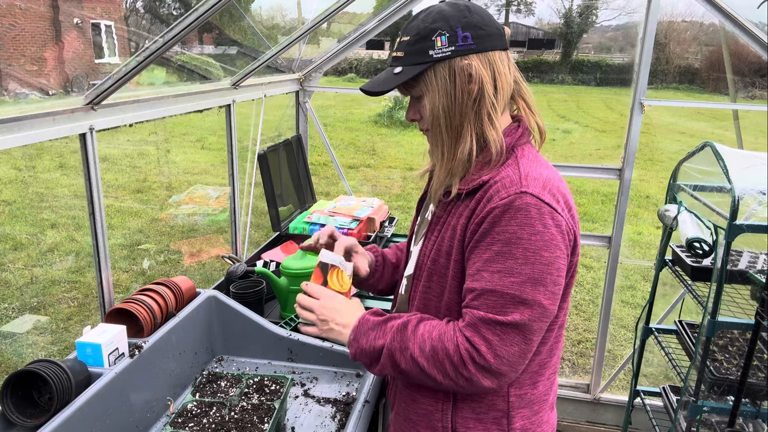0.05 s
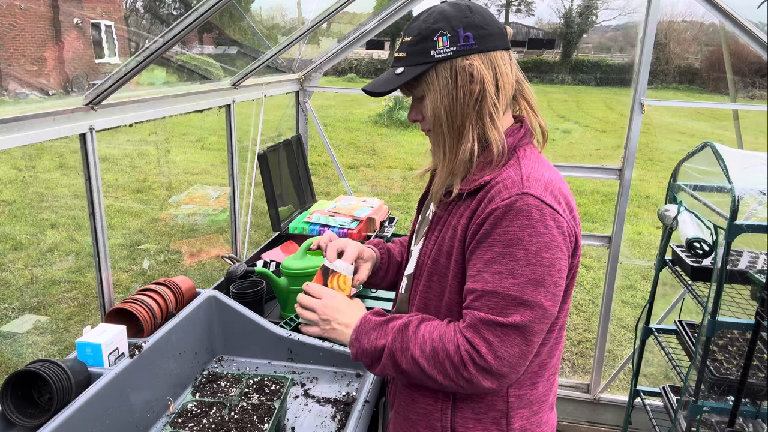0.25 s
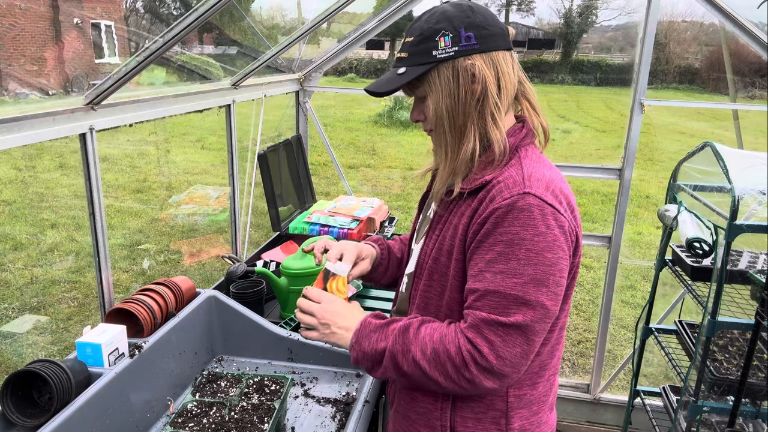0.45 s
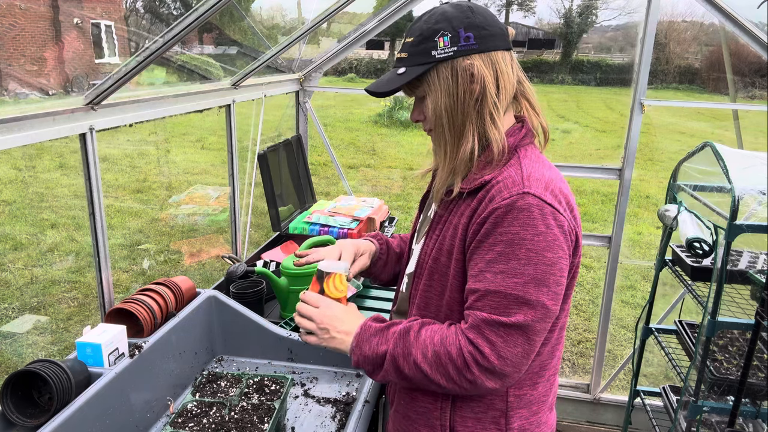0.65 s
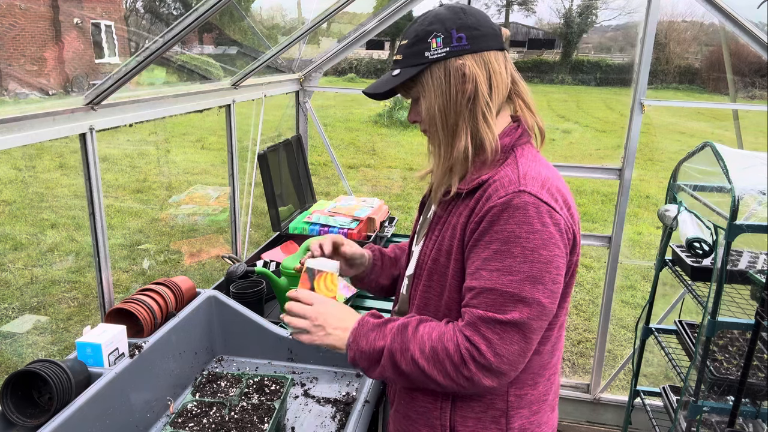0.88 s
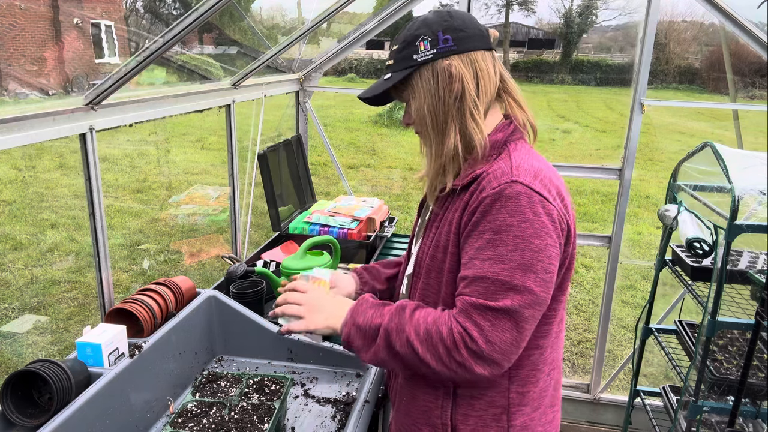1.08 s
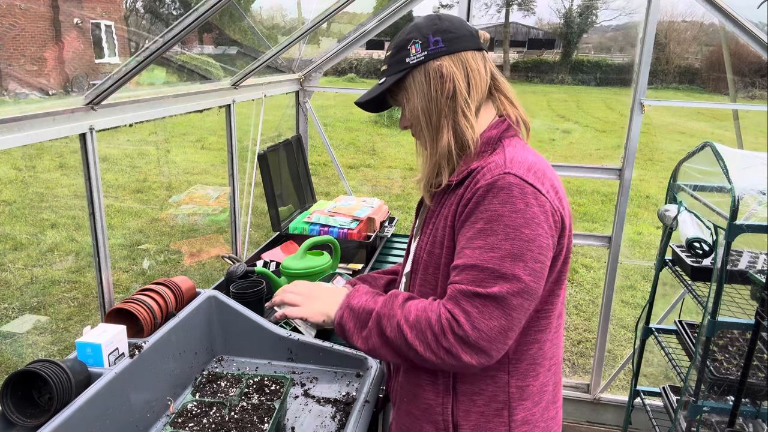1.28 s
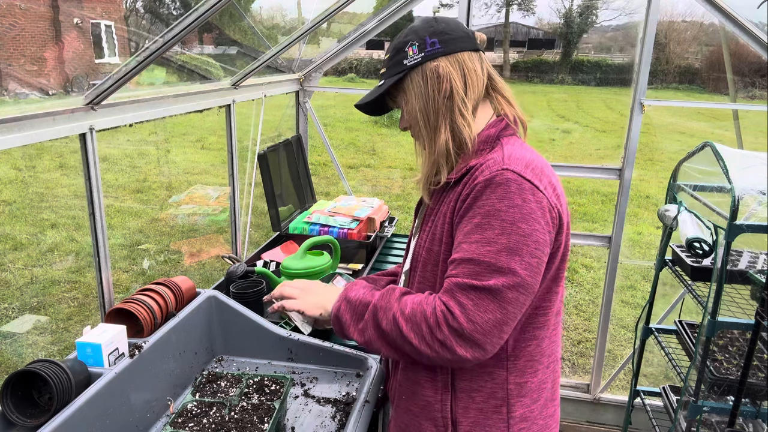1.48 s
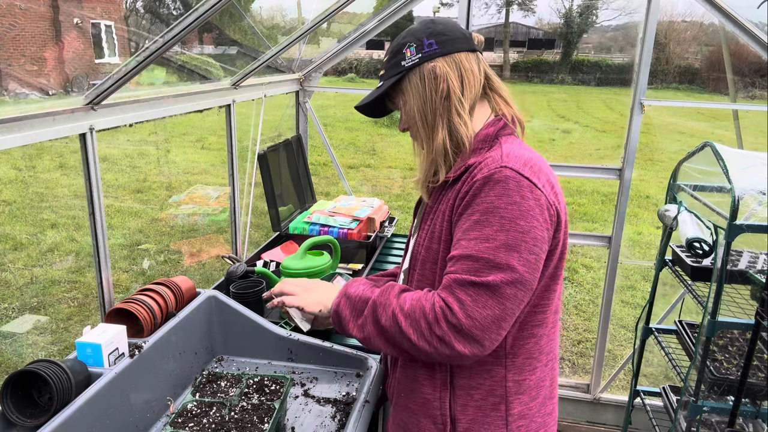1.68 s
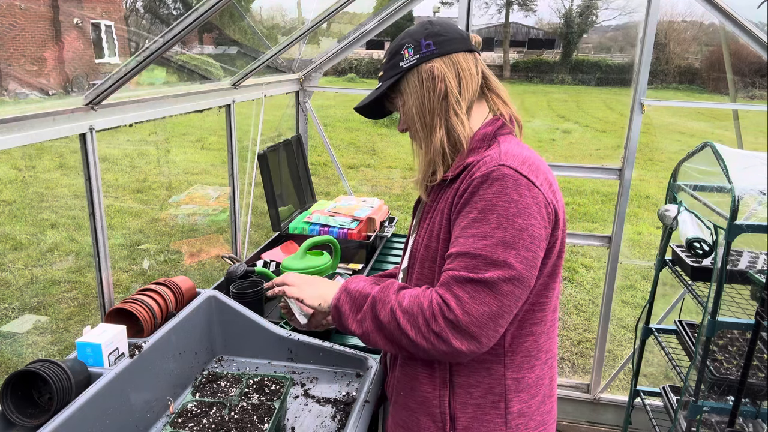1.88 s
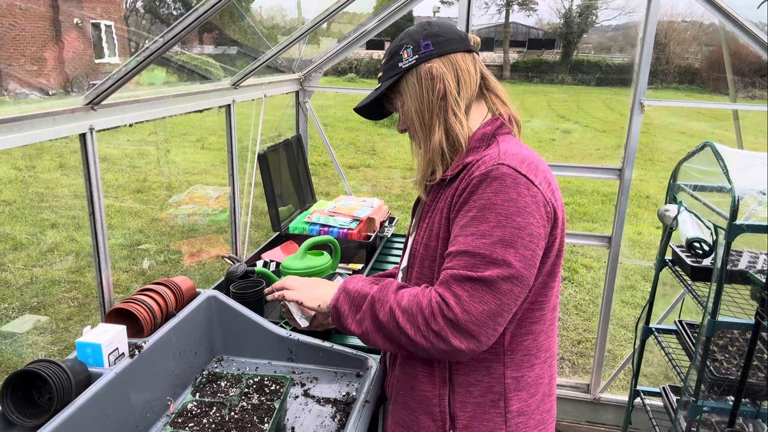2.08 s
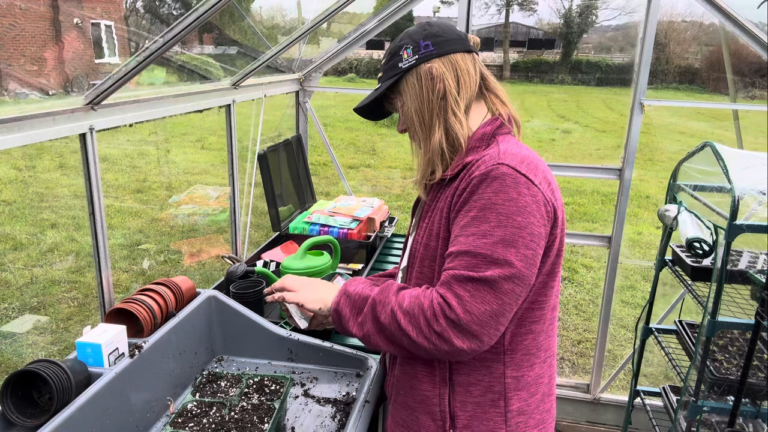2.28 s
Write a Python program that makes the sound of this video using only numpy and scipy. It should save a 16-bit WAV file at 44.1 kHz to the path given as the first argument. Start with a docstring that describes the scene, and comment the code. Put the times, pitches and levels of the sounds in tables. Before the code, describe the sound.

A small plastic tub of dry grains is handled close to the microphone. Fingers scrape it and the lid snaps open, then the grains slide and rattle twice, with a short greenhouse echo and faint outdoor rumble.

```python
"""Grain tub in a greenhouse

Close to a single microphone, fingers scrape and bump a small tub of dry grains; its plastic lid snaps open.
Tipped twice, the tub lets the grains slide and rattle along its wall. The bench and the glass
return a short bright echo. Behind it lie a few faint tones and a quiet, distant outdoor rumble."""
import sys
import numpy as np
from scipy import signal
from scipy.fft import rfft, irfft
from scipy.io import wavfile
from scipy.ndimage import uniform_filter1d

SR = 44100
rng = np.random.default_rng(int(sys.argv[2]) if len(sys.argv) > 2 else 0)


def generate_wav(signal):
    """Clip the signal to [-1, 1] and save it as 16-bit WAV at the path in sys.argv[1]."""
    frames = np.transpose(np.atleast_2d(signal))
    scaled = np.clip(frames, -1, 1) * 32767
    pcm = np.round(scaled).astype(np.int16)
    wavfile.write(sys.argv[1], SR, pcm)


N = 108045


def undb(db):
    """Decibels to gain."""
    return 10 ** (np.asarray(db) / 20)


def unit_energy(h):
    """Scale a response so that it keeps the power of white noise passing through."""
    return h / np.sqrt(np.sum(h ** 2))


def through(x, h):
    """Pass a sound through a response."""
    return signal.fftconvolve(x, h)[:N]


def add(out, start_s, x):
    """Mix a sound in at a time."""
    i = max(int(start_s * SR), 0)
    out[i:i + len(x)] += x[:N - i]


def colour(points, size=4096):
    """Minimum-phase response whose spectrum follows points of f/Hz, relative level/dB."""
    hz, db = np.array(points).T
    f = np.maximum(np.fft.rfftfreq(size, 1 / SR), 1)
    gain = undb(np.interp(np.log(f), np.log(hz), db))
    cepstrum = irfft(np.log(gain))
    cepstrum[1:size // 2] *= 2
    cepstrum[size // 2 + 1:] = 0
    return unit_energy(irfft(np.exp(rfft(cepstrum))))


def burst(fade_s, size=2048, passes=3):
    """A short random flutter that dies away; each pass evens out its spectrum."""
    fade = np.exp(-np.arange(size) / SR / fade_s)
    flutter = rng.standard_normal(size) * fade
    for _ in range(passes):
        phase = np.angle(rfft(flutter))
        flutter = irfft(np.exp(1j * phase)) * fade ** .5
    return unit_energy(flutter)


def impacts(per_s, spread_db, max_spreads=1.3):
    """Random tiny contacts of uneven size, with a steady overall power."""
    occurs = rng.random(N) < per_s / SR
    strength = undb(spread_db * np.minimum(rng.standard_normal(N), max_spreads))
    contacts = occurs * strength * rng.choice([-1, 1], N)
    local_power = np.abs(uniform_filter1d(contacts ** 2, 1500))
    return contacts / np.sqrt(local_power + 1e-9)


def outdoors(level_db=-63):
    """Steady distant rumble and air from beyond the glass."""
    # outdoor spectrum: f/Hz, relative level/dB
    spectrum = [(20, -14), (40, -3.5), (70, -4), (100, 1), (125, -8), (165, -6.5), (240, -15), (400, -12.5),
                (700, -15.5), (1200, -17), (1900, -23), (3000, -47), (5000, -40), (8000, -42), (16000, -61)]
    rumble = through(rng.standard_normal(N), colour(spectrum))
    return undb(level_db) * rumble / np.sqrt(np.mean(rumble ** 2))


def tones(t):
    """A faint low ring and two thin distant whistles swell and fade."""
    # tones: start t/s, length/s, f/Hz, peak level/dB
    swells = [(-.3, 1.13, 416.2, -61.5), (0.738, 0.057, 3570, -57.5), (0.978, 0.082, 1314, -65.5)]
    out = np.zeros(N)
    for start, length, hz, db in swells:
        swell = np.sin(np.pi * np.clip((t - start) / length, 0, 1))
        out += undb(db) * swell * np.sin(2 * np.pi * hz * t)
    return out


def glass_echo(x, gap_s=.01, near_db=-11.5, tail_db=-13, low_t60_s=.22, high_t60_s=.2, split_hz=5000):
    """A quick cluster of echoes from the nearest panes, then a faint tail, shorter in the treble."""
    t = np.arange(SR // 2) / SR
    noise = rng.standard_normal(len(t))
    low = signal.sosfilt(signal.butter(2, split_hz, fs=SR, output="sos"), noise)
    high = signal.sosfilt(signal.butter(2, split_hz, "high", fs=SR, output="sos"), noise)
    tail = low * undb(-60 * t / low_t60_s) - high * undb(-60 * t / high_t60_s)
    near_panes = burst(fade_s=.021, size=len(t))
    echo = np.zeros(N)
    add(echo, gap_s, undb(near_db) * near_panes + undb(tail_db) * unit_energy(tail))
    return through(x, echo)


def with_bench(x, gap_s=.002, echo_db=-8):
    """The direct sound plus quick reflections from the bench and the potting tray."""
    echo = np.zeros(SR // 8)
    add(echo, gap_s, undb(echo_db) * burst(fade_s=.0052))
    return x + through(x, echo)


def tub_ring(pitch=1):
    """The hollow ring of the tub: damped resonances of alternating sign."""
    # air and wall resonances: f/Hz, relative level/dB, t60/s
    modes = [(1104, 1, 0.023), (1162, -9, 0.082), (1233, -1, 0.025), (1364, 5, 0.021), (1480, 2, 0.039),
             (1976, -2, 0.017), (2925, -4, 0.026)]
    t = np.arange(SR // 8) / SR
    ring = sum((-1) ** k * undb(db - 60 * t / t60) * np.sin(2 * np.pi * pitch * hz * t)
               for k, (hz, db, t60) in enumerate(modes))
    return unit_energy(ring)


def hand_bumps(t):
    """The hands knock dully against the tub as they change grip."""
    # soft knocks: t/s, fade/s, level/dB
    knocks = [(0.299, 0.066, -48.5), (0.493, 0.054, -56), (0.57, 0.075, -60)]
    # spectrum of a knock: f/Hz, relative level/dB
    spectrum = [(25, -13.5), (60, -5.5), (130, 6), (220, -9.5), (450, -7.5), (800, -9), (1500, -40),
                (6000, -54)]
    push = sum(undb(db) * (t > start) * np.exp(-np.abs(t - start) / fade) for start, fade, db in knocks)
    return through(rng.standard_normal(N) * push, colour(spectrum))


def finger_scrapes(t, attack_share=.3):
    """Stick-slip friction rasps on the lid and stirs the body of the tub."""
    # finger strokes: t/s, hold/s, release/s, rasp level/dB, hollow ring level/dB
    strokes = [(-.02, 0.016, 0.02, -35.5, -43), (0.073, 0.022, 0.053, -62, -69),
               (0.143, 0.028, 0.054, -48.5, -63), (0.218, 0.019, 0.03, -39.5, -48.5),
               (0.246, .012, .025, -50.5, -47.5), (0.285, 0.014, 0.015, -43, -43),
               (0.297, 0.0076, 0.013, -44, -38), (0.315, 0.026, 0.017, -38.5, -38.5),
               (0.381, 0.016, 0.06, -46.5, -52), (0.582, 0.0049, 0.018, -46, -45.5),
               (0.647, 0.087, 0.1, -62, -56.5), (0.843, 0.019, 0.0092, -55.5, -49),
               (0.86, 0.029, 0.0073, -47.5, -49.5), (0.904, .01, 0.0022, -52.5, -44.5),
               (0.921, .08, 0.21, -77, -77)]
    # spectrum of the rasp: f/Hz, relative level/dB
    spectrum = [(60, -29.5), (400, -9), (750, -20.5), (1200, -19), (1800, 2), (2250, -2), (2700, 2.5),
                (3500, 4.5), (4400, -2.5), (6200, -4), (7500, -10), (10500, -14.5), (16000, -26.5)]
    rasp, hollow = np.zeros((2, N))
    for start, hold, release, rasp_db, ring_db in strokes:
        rise = np.clip((t - start) / (attack_share * hold), 0, 1)
        fall = np.exp(-np.maximum(t - start - hold, 0) / release)
        rasp += undb(rasp_db) * rise * fall
        hollow += undb(ring_db) * rise * fall
    slips = impacts(per_s=2600, spread_db=5)
    return through(slips * rasp, colour(spectrum)) + through(slips * hollow, tub_ring())


def sliding_grains(t, slide_db=-.5, shapes=12, soft_hz=2020, bright_flow_db=-38.5, brightening=.43):
    """Grains of several shapes tumble along the tilted wall, brighter as they speed up."""
    # grain flow, one curve for each tip of the tub: t/s, level/dB
    tips = [
        [(1.24, -77.5), (1.33, -54), (1.385, -51.5), (1.418, -41), (1.44, -45.5), (1.5, -43), (1.57, -47),
         (1.6, -43.5), (1.66, -47.5), (1.72, -61), (1.78, -65), (1.85, -69)],
        [(1.86, -64), (1.895, -48.5), (1.94, -48), (1.99, -43), (2.06, -42), (2.12, -43), (2.16, -37.5),
         (2.2, -44.5), (2.31, -43), (2.38, -48), (2.45, -63)],
    ]
    # larger grains striking the wall: t/s, level/dB
    ticks = [(1.3989, -23.5), (1.4422, -28), (1.4533, -12), (1.4638, -10), (1.4955, -20.5), (1.5054, -32),
             (1.522, -10.5), (1.531, -17), (1.547, -13.5), (1.585, -22), (1.6228, -17.5), (1.986, -27),
             (2.02, -16), (2.0379, -17), (2.049, -14), (2.058, -12), (2.1017, -18), (2.135, -18),
             (2.145, -22), (2.168, -16.5), (2.271, -20), (2.305, -19.5)]
    # spectrum of a grain on the wall: f/Hz, relative level/dB
    spectrum = [(100, -35), (400, -33.5), (650, -25.5), (880, -17.5), (1040, -3.5), (1160, 1.5), (1320, -6),
                (1500, 2.5), (1650, 0.5), (1850, -4.5), (2050, -5.5), (2380, 1.5), (2700, -5.5), (3200, -1),
                (3800, -4.5), (4200, -11), (4800, -9), (6000, -10.5), (7200, -15), (8500, -20),
                (10600, -25.5), (16000, -37.5)]
    flow = sum(undb(np.interp(t, *np.array(tip).T, left=-np.inf, right=-np.inf)) for tip in tips)
    hits = impacts(per_s=1300, spread_db=9) * flow * undb(slide_db)
    shape = rng.integers(0, shapes, N)
    slide = sum(through(hits * (shape == k), burst(fade_s=.0013, passes=0)) for k in range(shapes))
    # slow grains touch softly: the treble gains `brightening` dB per dB of flow
    soft = signal.sosfilt(signal.butter(1, soft_hz, fs=SR, output="sos"), slide)
    treble_gain = (flow / undb(bright_flow_db)) ** brightening
    rattle = soft + (slide - soft) * treble_gain
    for start, db in ticks:
        add(rattle, start, undb(db) * burst(fade_s=.0018, passes=0))
    return through(rattle, colour(spectrum))


def lid_clicks(after_contacts=.44):
    """Each click is a chatter: the lid snaps, the rim cracks, the tub rings at a pitch set by the grip."""
    # clicks: t/s, snap level/dB, crack level/dB, ring level/dB, chatter fade/s, ring pitch ratio
    clicks = [(0.1353, -33, -38, -46, 0.0012, 0.74), (0.2077, -18.5, -26, -71, 0.0037, 1),
              (0.2227, -59, -12.5, -54, 0.0027, 0.6), (.3015, -15, -26, -16, 0.0014, 0.81),
              (0.3967, -46, -9, -15.5, 0.0023, .8), (0.486, 1, -11, -7.5, 0.0027, 0.99),
              (.567, -27, -22.5, -13, .002, 1), (.5695, -24, -13.5, -7, 0.0053, 0.99),
              (0.7347, -29, -31, -20.5, 0.0087, 1)]
    # spectrum of the lid's sharp snap: f/Hz, relative level/dB
    snap_spectrum = [(300, -50.5), (1800, -25.5), (2300, -15.5), (2750, 3.5), (3500, 1), (4050, 5),
                     (4500, -9.5), (6300, -14), (9000, -32), (13000, -43), (16000, -46)]
    # spectrum of the rim's broad crack: f/Hz, relative level/dB
    crack_spectrum = [(100, -25.5), (600, -24.5), (1000, -9.5), (2000, -3), (3200, -2.5), (6000, -0.5),
                      (8000, -3.5), (10500, -8.5), (16000, -24)]
    snap, crack = colour(snap_spectrum), colour(crack_spectrum)
    snaps, rim_and_ring = np.zeros((2, N))
    for start, snap_db, crack_db, ring_db, chatter_s, pitch in clicks:
        contacts = after_contacts * burst(chatter_s)
        contacts[0] += 1  # the first, hard contact
        add(snaps, start, undb(snap_db) * through(contacts, snap))
        add(rim_and_ring, start, undb(crack_db) * through(burst(chatter_s), crack))
        add(rim_and_ring, start, undb(ring_db) * through(burst(chatter_s), tub_ring(pitch)))
    return snaps, rim_and_ring


def scene(snap_beam_db=5):
    """The tub close up over the bench, the glass around it and the outdoors far behind, in mono."""
    t = np.arange(N) / SR
    snaps, rim_and_ring = lid_clicks()
    tub = finger_scrapes(t) + rim_and_ring + hand_bumps(t) + sliding_grains(t)
    # the snap beams at the microphone, so less of it reaches the glass
    close = with_bench(tub + undb(snap_beam_db) * snaps)
    return (close + glass_echo(tub + snaps) + tones(t) + outdoors())[None]


def record(dry, top_hz=16200):
    """The recorder cuts the top treble steeply."""
    return signal.sosfilt(signal.ellip(8, .2, 70, top_hz, fs=SR, output="sos"), dry)


dry = scene()
out = record(dry)
generate_wav(out)
```